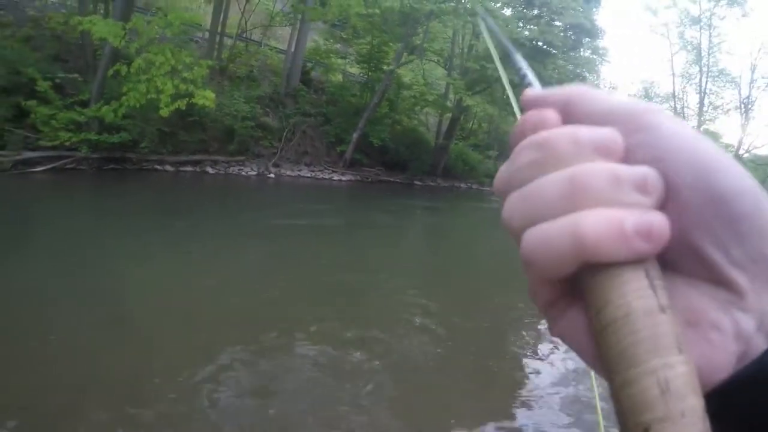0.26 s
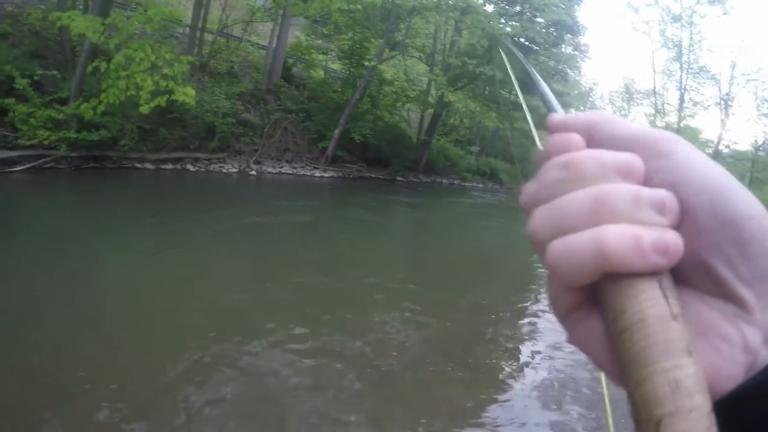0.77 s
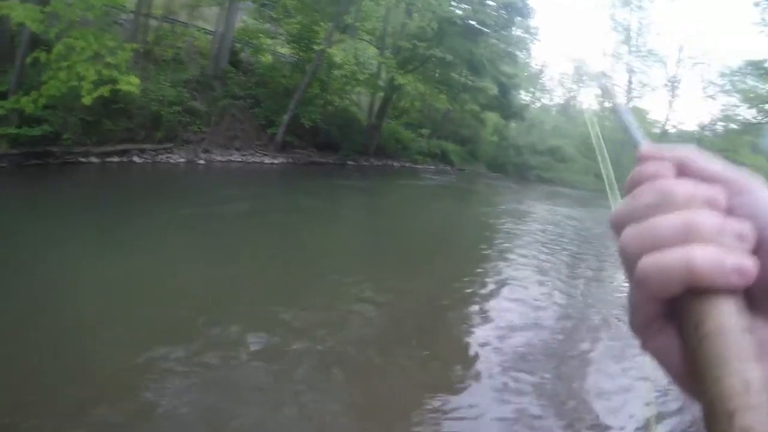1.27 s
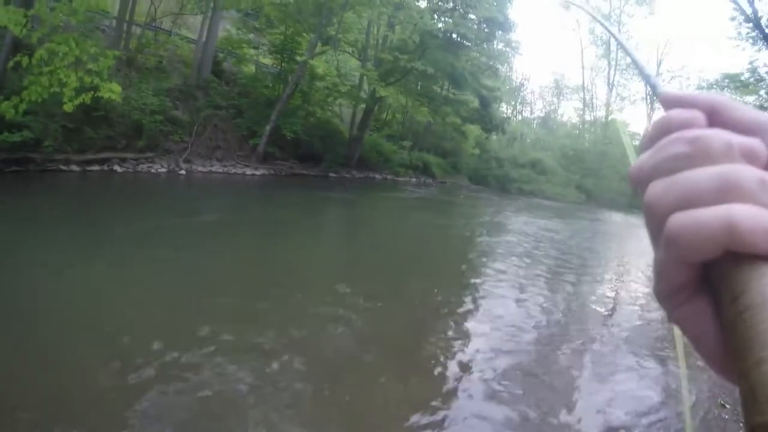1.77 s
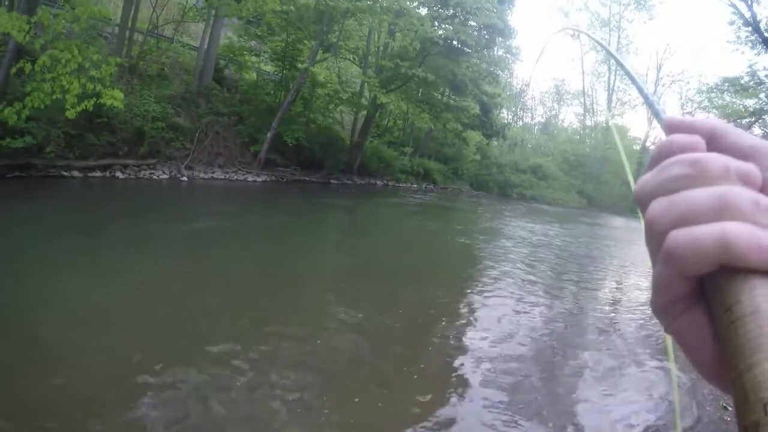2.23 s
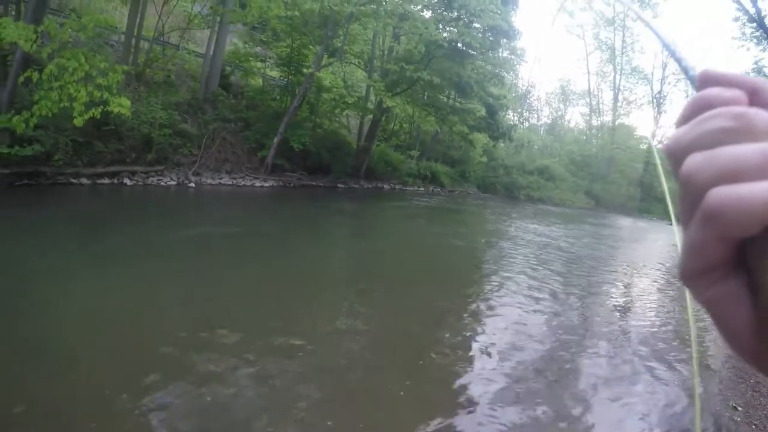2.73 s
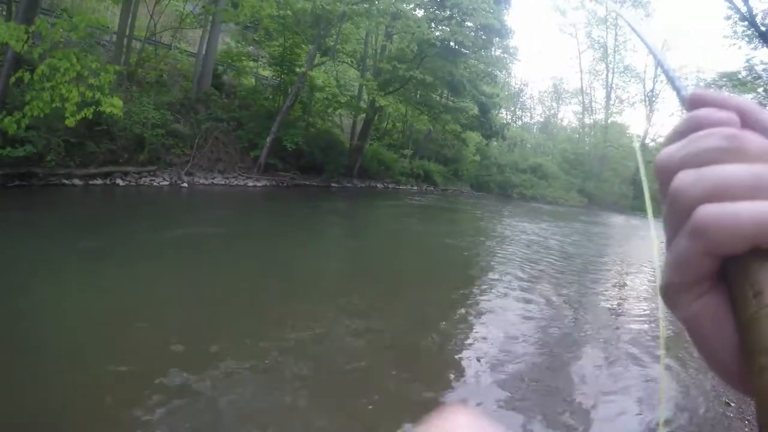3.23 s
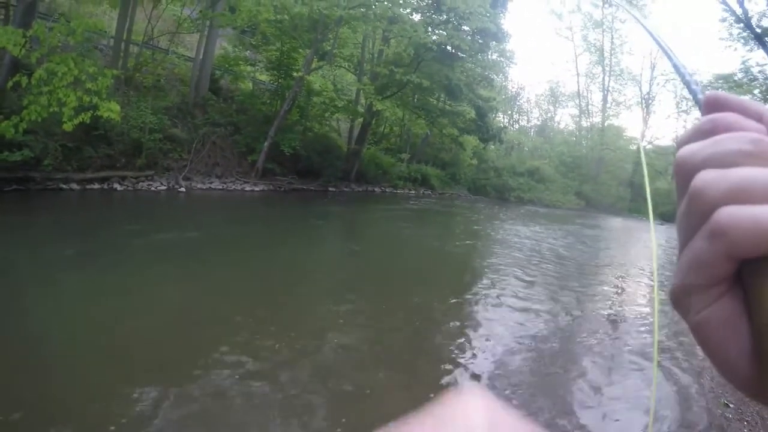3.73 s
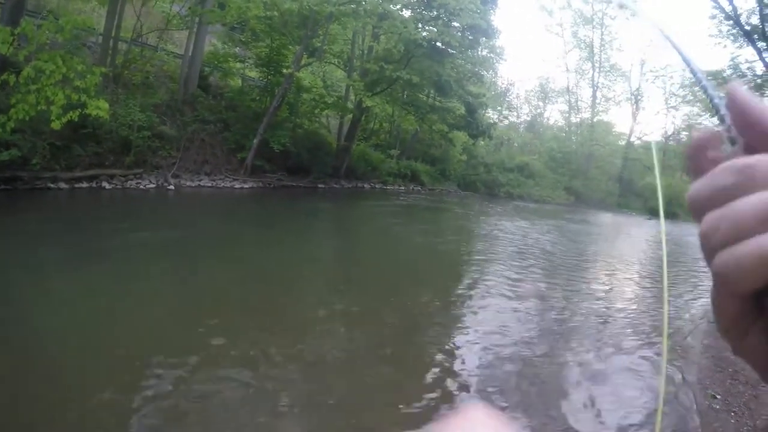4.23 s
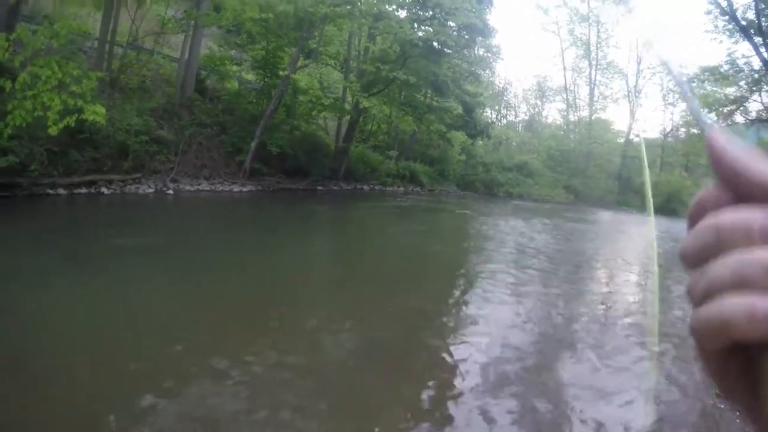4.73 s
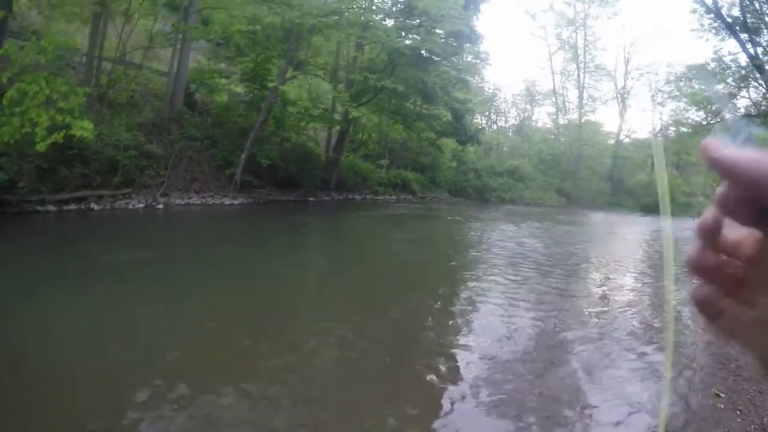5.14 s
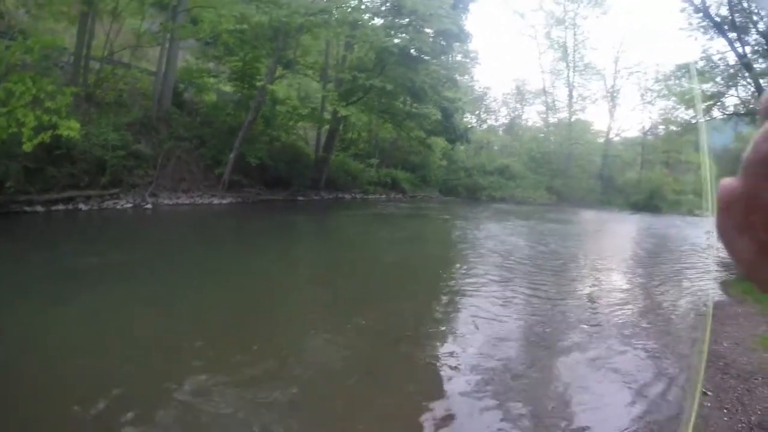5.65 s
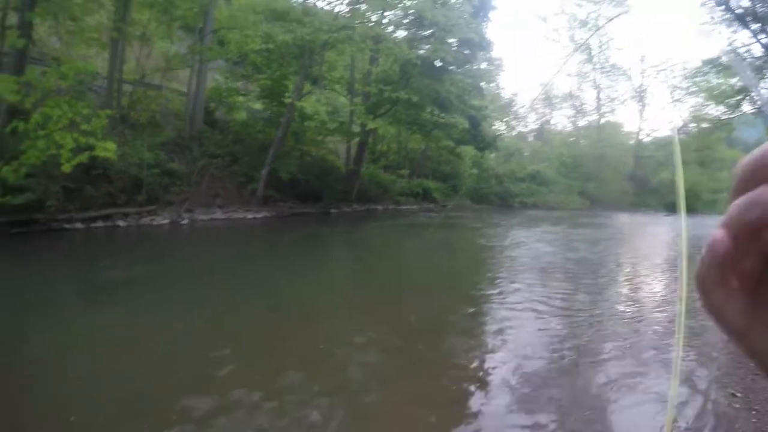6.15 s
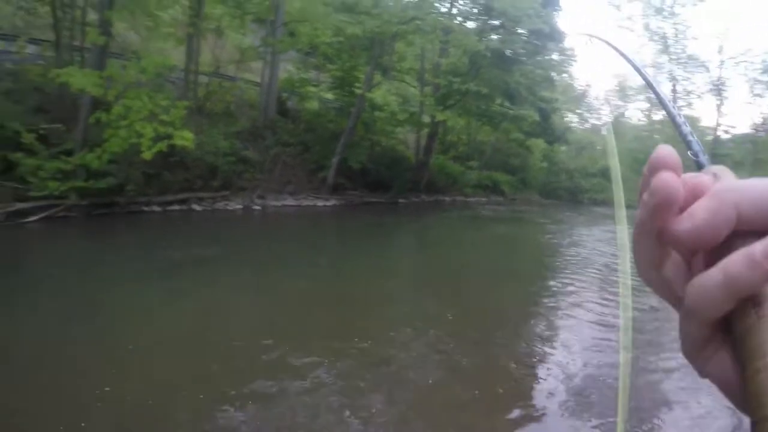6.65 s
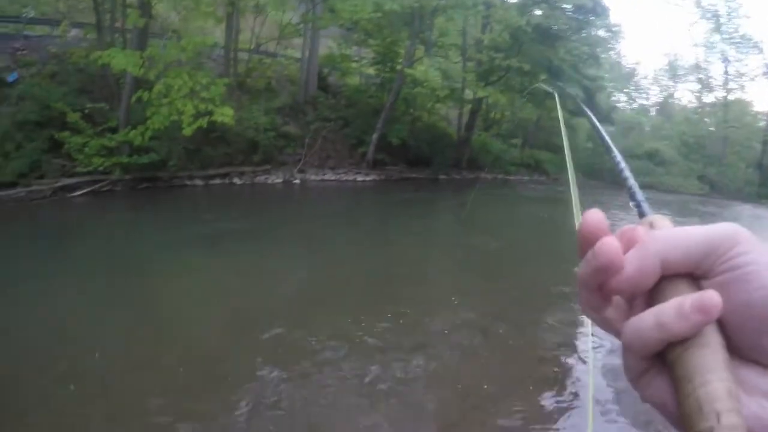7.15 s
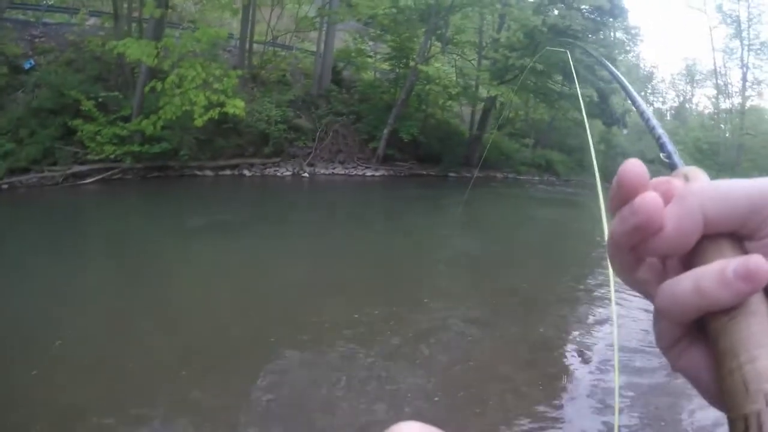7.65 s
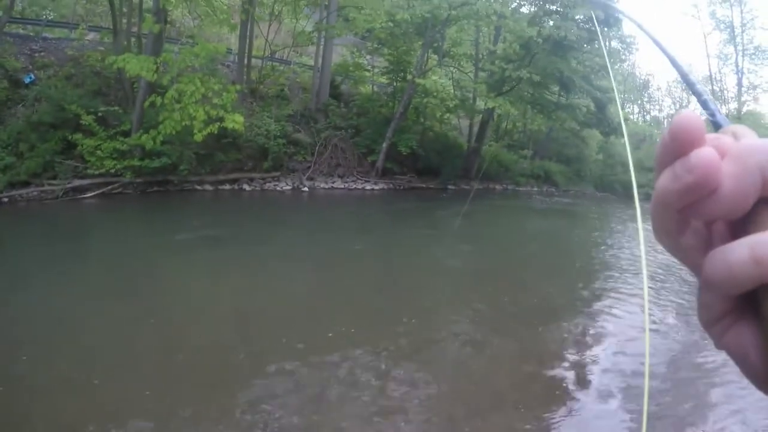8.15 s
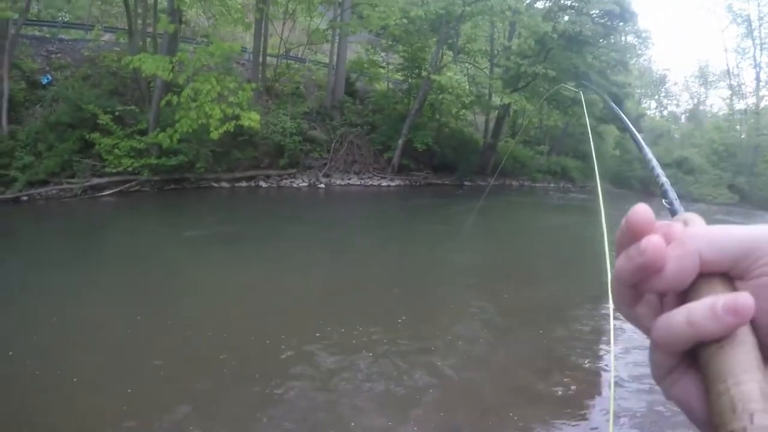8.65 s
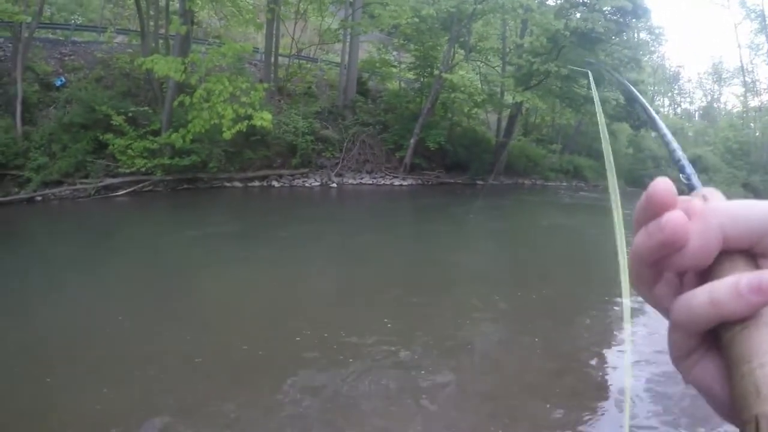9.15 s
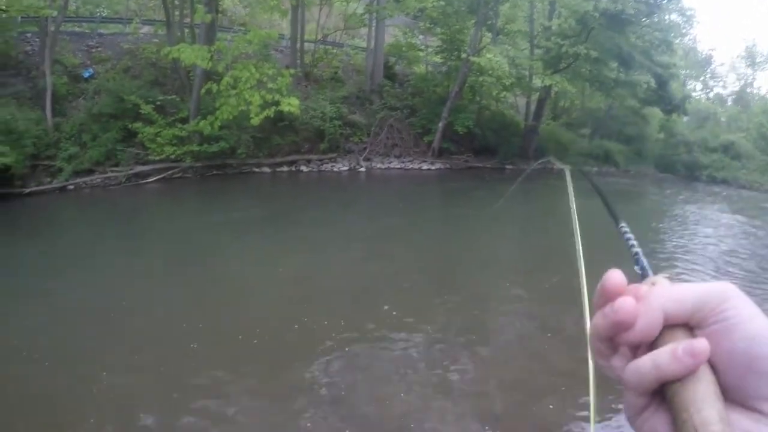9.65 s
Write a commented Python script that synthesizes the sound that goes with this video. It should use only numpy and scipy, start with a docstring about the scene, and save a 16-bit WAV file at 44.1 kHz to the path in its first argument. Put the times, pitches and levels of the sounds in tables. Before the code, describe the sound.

A fly fishing reel clicks close to a body-worn microphone beside a slow river. About ten sharp, metallic ticks sound in the first 0.6 seconds. Two short ratcheting buzzes follow at about 1.1 and 1.3 seconds as a fish takes line. The reel then rests, and things are quietest from 2 to 2.7 seconds. From 3 to 5 seconds it winds in a run of quick, uneven clicks. It pauses again, with a faint sleeve rustle around 6 to 6.7 seconds. Scattered single ticks return near 7 seconds, crowd together after 9, and become a fast, raspy buzz from 9.7 seconds to the end. Low rumble and dull bumps from body movement run underneath, with light cloth rubbing and occasional soft, hollow knocks, the clearest at about 7.7 seconds. The river is a faint, steady wash throughout.

```python
"""At the edge of a slow river, an angler with a chest camera plays a fish on a click-and-pawl fly reel.
Each tooth of the spool deflects and releases the pawl, an impact that excites the reel's damped modes:
single ticks, short runs and a last fast buzz as the fish takes line. Body motion rocks the camera,
knocks ring its housing and cloth friction rustles. The river murmurs behind as broadband noise."""
import sys
import numpy as np
from scipy import signal
from scipy.fft import rfft, irfft
from scipy.io import wavfile
from scipy.ndimage import uniform_filter1d

SR = 44100
rng = np.random.default_rng(int(sys.argv[2]) if len(sys.argv) > 2 else 0)


def wrap_up_sound(samples):
    """Save the sound to the file named by the first command line argument, as 16-bit audio."""
    columns = np.atleast_2d(samples).T
    # keep every value between -1 and 1, then stretch to whole-number steps
    tamed = np.clip(columns, -1, 1)
    steps = np.round(tamed * 32767).astype(np.int16)
    wavfile.write(sys.argv[1], SR, steps)


N = 435708
TIME = np.arange(N) / SR
SIZE = 4096  # samples in one impact
AGE, FREQ = np.arange(SIZE) / SR, np.fft.rfftfreq(SIZE, 1 / SR)
LEAD_S = 0.004  # the pawl's sound starts this long before its release
SINCE_RELEASE = AGE - LEAD_S


# single snaps of the pawl: t/s, level/dB
SNAPS = [(0.156, -38.5), (0.223, -37.5), (0.236, -43), (0.261, -33), (0.308, -31), (0.352, -35),
         (0.358, -32), (0.39, -32.5), (0.443, -29), (0.603, -27), (2.976, -29), (3.04, -35.5),
         (3.081, -33.5), (3.127, -34.5), (3.152, -41.5), (3.192, -26.5), (3.243, -30), (3.294, -29.5),
         (3.362, -32.5), (3.401, -29.5), (3.434, -25), (3.475, -31), (3.537, -31.5), (3.578, -31),
         (3.633, -31.5), (3.695, -33), (3.743, -30), (3.816, -33), (3.864, -32), (3.901, -31.5),
         (3.94, -32), (3.985, -36), (4.021, -42), (4.042, -34.5), (4.057, -38), (4.087, -33.5),
         (4.165, -32.5), (4.227, -29.5), (4.424, -26.5), (4.471, -26), (4.51, -30.5), (4.545, -26.5),
         (4.584, -29), (4.625, -30.5), (4.67, -35.5), (4.705, -33), (4.757, -36), (4.798, -29),
         (4.838, -29.5), (4.862, -35), (4.901, -29), (4.955, -27), (4.997, -31.5), (5.037, -32.5),
         (6.922, -28), (7.105, -24), (7.314, -24.5), (7.766, -21), (7.859, -26.5), (8.022, -29.5),
         (8.303, -29), (8.48, -27), (8.562, -28), (8.574, -29), (8.688, -27), (8.741, -29.5),
         (8.857, -30.5), (8.999, -27), (9.092, -21.5), (9.135, -24.5), (9.173, -30), (9.212, -32),
         (9.261, -23), (9.285, -31), (9.315, -26), (9.356, -39), (9.368, -26), (9.378, -53), (9.401, -26),
         (9.425, -17), (9.461, -22.5), (9.519, -26.5), (9.551, -28.5), (9.579, -25), (9.606, -24.5),
         (9.63, -26), (9.651, -23)]
# winding in tightens the pawl and lets spool and rod ring more: start t/s, end t/s
WINDING_IN = [(0.1, 0.47), (3.1, 5.06)]
# thin, lasting modes of the spool: f/Hz, relative level/dB, T60/s
SPOOL_MODES = [(3720, -17, 0.029), (7140, -28, 0.076), (8600, -24, 0.027)]
# low modes of rod and grip: f/Hz, relative level/dB, T60/s
ROD_MODES = [(189, -20, 0.054), (235, -20.5, 0.031), (292, -23, 0.044), (370, -27, 0.04)]
def reel(pawl_hz=3308, usual_db=-27.5, graze_below_db=-35, rod_lag_s=0.0019):
    """Impact excitation: each tooth flicks the pawl, which rings itself, the frame, spool and rod."""
    times, db = np.vstack([SNAPS] + [teeth(run) for run in LINE_RUNS]).T
    count = len(times)
    winding = sum((times > start) & (times < end) for start, end in WINDING_IN)
    pitch_scatter, crack_scatter, rod_scatter = rng.standard_normal((count, 3)).T
    hz = pawl_hz + 324 * winding + np.where(winding, 215, 80) * np.clip(pitch_scatter, -1, 2)
    # the spring limits the crack, so strong snaps sound rounder; a mere graze loses it
    graze_db = np.maximum(graze_below_db - db, 0)
    crack_db = -27.5 + 0.24 * (db - usual_db) - 2 * graze_db - winding
    treble_db = (crack_db + 0.75 * crack_scatter - db)[:, None]
    steel = steel_response(count)
    rattle = contact(frame_response(), count, rise_s=0.00072, fall_s=0.00024, tail_db=-2.5, tail_s=0.0046)
    crack = contact(steel, count, rise_s=0.0006, fall_s=0.00042, tail_db=-10.5, tail_s=0.0038)
    # a brighter snap trades the pawl's clean note for the frame's dry rattle
    body = unit_energy(pawl_note(hz) + undb(-3 + 0.98 * treble_db) * rattle)
    force = undb(db)[:, None]
    snaps = force * (body + undb(treble_db) * crack)
    spool = force * undb(-3 + 9 * winding)[:, None] * ring(SPOOL_MODES, count)
    rod = undb(-26 - graze_db + 3 * winding + 2 * rod_scatter)[:, None] * ring(ROD_MODES, count)
    return place(times - LEAD_S, snaps) + place(times, spool) + place(times + rod_lag_s, rod)


# the fish takes line, one curve per run: t/s, tooth-passing f/Hz, level/dB
LINE_RUNS = [
    [(1.106, 50.3, -21.5), (1.135, 81, -22.5), (1.172, 45, -24)],
    [(1.279, 14.5, -24.5), (1.32, 71.5, -23), (1.365, 108.9, -26), (1.425, 75.8, -21.5)],
    [(9.6712, 67, -21), (9.688, 104.4, -23.5), (9.72, 117.9, -28), (9.795, 89.6, -25), (9.835, 154.6, -26),
     (9.879, 168.7, -24.5)],
]
def teeth(run, scatter_db=1.3):
    """Tooth passing: the integral of the rate counts off one snap per tooth, as rows of t/s, level/dB."""
    knots, tooth_hz, db = np.transpose(run)
    t = np.arange(knots[0], knots[-1], 1 / SR)
    passed = np.cumsum(np.interp(t, knots, tooth_hz)) / SR
    times = np.interp(np.arange(int(passed[-1]) + 1), passed, t)
    levels = np.interp(times, knots, db) + scatter_db * rng.standard_normal(len(times))
    return np.column_stack([times, levels])


def pawl_note(hz):
    """Damped oscillation: the note swells as the pawl leaves the tooth, then its spring damps it."""
    phase = rng.uniform(0, 2 * np.pi, (len(hz), 1))
    envelope = swell(SINCE_RELEASE, rise=0.00037, fall=0.00089)
    return unit_energy(envelope * np.sin(2 * np.pi * hz[:, None] * SINCE_RELEASE + phase))


# bright resonances of the steel pawl and gear: f/Hz, bandwidth/Hz, gain/dB
STEEL_RESONANCES = [(1930, 720, -9), (2850, 490, -3), (3950, 190, 5.5), (4420, 210, -8.5), (4950, 315, 2),
                    (5930, 215, 4.5), (6790, 630, 2), (8620, 710, -5), (8750, 600, -4.5), (9380, 630, 3.5),
                    (10300, 930, -3), (12650, 920, 2), (13460, 690, -0.5), (14560, 530, -5)]
def steel_response(count, scatter_db=1.73):
    """Modal superposition: each tooth shares its blow differently among the steel's resonances."""
    shares_db = scatter_db * rng.standard_normal((count, len(STEEL_RESONANCES), 1))
    return sum((-1) ** k * undb(db + shares_db[:, k]) * resonance(hz, width)
               for k, (hz, width, db) in enumerate(STEEL_RESONANCES))


# resonances of pawl spring and reel frame: f/Hz, bandwidth/Hz, gain/dB
FRAME_RESONANCES = [(2000, 170, -10.5), (2590, 47, -10), (3154, 470, -4), (3730, 40, -6), (4090, 160, -7)]
def frame_response():
    """Parallel resonators: the responses of spring and frame add."""
    return sum(undb(db) * resonance(hz, width) for hz, width, db in FRAME_RESONANCES)


def contact(response, count, rise_s, fall_s, tail_db, tail_s):
    """Forced vibration: a scrape up the tooth, the snap and dying chatter drive the resonances."""
    t = SINCE_RELEASE
    chatter = (t > 0) * undb(tail_db) * np.exp(-np.abs(t) / tail_s)
    force = np.sign(rng.standard_normal((count, SIZE))) * (swell(t, rise_s, fall_s) + chatter)
    radiation = 1 / np.sqrt(1 + (2000 / (FREQ + 1)) ** 8)  # small parts radiate low notes poorly
    return unit_energy(irfft(rfft(force) * response * radiation))


# spectrum of the scraping pawl: f/Hz, relative level/dB
RASP_SPECTRUM = [(1200, -8), (2500, 4), (3700, 2), (5200, 5), (7000, -8), (9500, -9), (11000, -19),
                 (15000, -12)]
def rasp(limit_db=-44, knee_hz=100):
    """Sliding friction: on a fast spool the pawl never settles and scrapes between snaps."""
    tooth_hz = sum(np.interp(TIME, *np.transpose(run)[:2], left=0, right=0) for run in LINE_RUNS)
    scrape = colour(rng.standard_normal(N), RASP_SPECTRUM)
    return scrape * undb(limit_db) * np.tanh(tooth_hz / knee_hz) ** 3


# the pawl eases off a tooth: t/s, level/dB
SOFT_RELEASES = [(0.174, -36), (0.856, -37.5), (0.869, -42.5), (3.858, -40), (4.235, -40), (4.882, -39),
                 (7.854, -39), (8.977, -40), (9.111, -38)]
def easing(pawl_hz=3170):
    """Free vibration without impact: let down slowly, the pawl gives only its own soft note."""
    times, db = np.transpose(SOFT_RELEASES)
    return place(times - LEAD_S, undb(db)[:, None] * pawl_note(np.full(len(times), pawl_hz)))


# blows of hand and rod butt near the camera housing: t/s, level/dB, extra thud level/dB
BLOWS = [(0.158, -38.5, -2), (0.238, -41.5, -1), (0.358, -39.5, -0.5), (1.022, -42.5, -0.5),
         (1.45, -43.5, 6.5), (2.172, -46, 0), (3.048, -45, 5.5), (3.532, -42, -10), (3.738, -45, 3),
         (4.021, -42.5, -2), (4.6, -46, 4), (4.691, -41, 3), (4.985, -43, 6), (5.961, -45.5, 3),
         (6.771, -38, 4), (7.111, -50, 3), (7.32, -49.5, 11), (7.691, -28.5, -5.5), (7.775, -48, 6)]
# upper modes of the housing: f/Hz, relative level/dB, T60/s
RAP_MODES = [(665, 8.5, 0.0062), (940, 0.5, 0.0075), (1075, -12, 0.016), (1400, 3.5, 0.0054),
             (1660, -2.5, 0.022), (2980, 3.5, 0.0046)]
# its hollow low modes: f/Hz, relative level/dB, T60/s
THUD_MODES = [(257, -1, 0.037), (365, -4, 0.044), (498, -6.5, 0.077), (778, -5, 0.021)]
def knocks(scuff_s=0.0097):
    """Impulse response: soft blows ring the housing, each with a short scuff and a hollow thud."""
    times, db, thud_db = np.transpose(BLOWS)
    count = len(times)
    friction = rng.standard_normal((count, SIZE)) * np.exp(-AGE / scuff_s)
    scuff = unit_energy(irfft(rfft(friction) * resonance(hz=690, width_hz=1700) ** 2))
    rap = undb(-3) * (ring(RAP_MODES, count) + undb(-3) * scuff)
    thud = undb(thud_db[:, None] - 1) * ring(THUD_MODES, count)
    return place(times, undb(db)[:, None] * (rap + thud))


# jolts of the camera on its strap: t/s, envelope peak level/dB, swing f/Hz
JOLTS = [(0.02, -38, 36), (0.291, -28, 52.7), (0.79, -42, 38), (1.03, -26.5, 60), (1.17, -25, 61),
         (1.252, -27, 61), (1.432, -22.5, 73), (2.241, -25.5, 36.6), (2.48, -26.5, 35.8),
         (2.788, -26, 42.7), (3.027, -25.5, 44), (3.6, -24, 65.4), (3.75, -19.5, 73), (3.981, -26.5, 59),
         (4.14, -26, 49), (4.52, -24.5, 45.6), (4.6, -27, 105), (4.9, -29, 85), (4.987, -22, 48),
         (5.457, -23, 44), (5.942, -25.5, 36.5), (6.28, -23.5, 33.7), (6.411, -24.5, 39.5),
         (6.891, -23.5, 37.7), (6.999, -21, 28.8), (7.339, -25.5, 36.8), (7.82, -25, 37.7),
         (8.311, -27, 35.6), (8.792, -24, 36.2), (9.331, -26, 37), (9.591, -25.5, 49.6), (9.851, -26.5, 42)]
def bumps(flank_cycles=0.36):
    """Heavy damping: each jolt swings the camera to and fro about once."""
    times, db, hz = np.transpose(JOLTS)
    middle = AGE[-1] / 2
    cycles = hz[:, None] * (AGE - middle)
    phase = rng.uniform(0, 2 * np.pi, (len(times), 1))
    envelope = swell(cycles, flank_cycles, flank_cycles) * signal.windows.tukey(SIZE, 0.5)
    return place(times - middle, undb(db)[:, None] * envelope * np.sin(2 * np.pi * cycles + phase))


# the arm's work against the fish: t/s, effort level/dB
ARM_EFFORT = [(0.0, -59.5), (0.3, -56), (0.63, -60.5), (1.29, -54), (1.56, -59), (1.87, -63.5),
              (2.75, -62.5), (2.94, -58), (3.41, -55.5), (4.37, -54.5), (4.56, -55.5), (4.81, -52),
              (5.31, -61.5), (6.03, -58.5), (6.3, -57.5), (6.69, -60.5), (6.9, -56), (7.32, -62.5),
              (7.98, -57), (8.09, -59.5), (9.16, -58), (9.88, -51)]
def arm_effort(steady_hold_db=-57.5):
    """Amplitude modulation: effort, in dB above a steady hold, drives rumble and cloth noise."""
    return np.interp(TIME, *np.transpose(ARM_EFFORT)) - steady_hold_db


# spectrum of the body's sway: f/Hz, relative level/dB
SWAY_SPECTRUM = [(10, -1.5), (21, -11), (30, 1), (48, -7.5), (62, -10), (90, -26.5), (200, -58)]
# spectrum of the arm's judder: f/Hz, relative level/dB
JUDDER_SPECTRUM = [(45, -30.5), (66, -6), (85, -2), (108, -8), (150, -17.5), (300, -28.5)]
# the body keeps still: start t/s, end t/s
STILLNESS = [(1.97, 2.72)]
def rumble(pull_db, still_db=-11):
    """Structure-borne sound: the camera rocks with the body and judders when the arm pulls."""
    sway = rocking(SWAY_SPECTRUM, steady_s=0.14) * undb(-40 + 0.34 * pull_db + 3 * wander(9))
    judder = rocking(JUDDER_SPECTRUM, steady_s=0.21) * undb(-49.5 + pull_db)
    return (sway + judder) * undb(still_db * during(STILLNESS, ramp_s=0.063))


def rocking(spectrum, steady_s):
    """Random vibration: low noise divided by its running rms swings with nearly even strength."""
    swing = colour(rng.standard_normal(N), spectrum)
    power = uniform_filter1d(np.abs(signal.hilbert(swing)) ** 2, int(steady_s * SR)) / 2
    return swing / np.sqrt(power)


# spectrum of cloth rubbing the housing: f/Hz, relative level/dB
RUB_SPECTRUM = [(70, -32), (130, 1.5), (220, 1.5), (330, -6.5), (500, -1), (800, -6), (1120, -29),
                (1400, -28), (1750, -36.5), (3000, -12)]
# spectral weighting of the sleeve's folds: f/Hz, relative level/dB
FOLD_SPECTRUM = [(600, -2.5), (1100, 10.5), (1400, 1.5), (1750, 7), (2300, 0.5), (3200, 1.5), (4100, 0),
                 (5500, -4.5), (7500, -15.5), (10000, -28.5), (15000, -27)]
# the hand shifts, the sleeve lifts off the housing and rustles more: start t/s, end t/s
GRIP_SHIFT = [(5.88, 6.7)]
def clothing(pull_db, effort_db, slips_per_s=35):
    """Stick-slip friction: cloth tugs over the housing while folds of the sleeve scrape."""
    slips = (rng.random(N) < slips_per_s / SR) * rng.uniform(-1, 1, N)
    # soft cloth lets go over about a millisecond, which keeps each tug dull
    tugs = signal.sosfilt(signal.butter(2, 600, fs=SR, output="sos"), slips)
    slide = undb(-32) * rng.uniform(-1, 1, N)
    folds = 0
    for band_hz in [(500, 1400), (1400, 2600), (2600, 4500), (4500, 15000)]:
        bandpass = signal.butter(3, band_hz, "bandpass", fs=SR, output="sos")
        hiss = signal.sosfilt(bandpass, rng.standard_normal(N))
        folds += hiss * undb(2 * wander(35) + wander(250))
    regrip = during(GRIP_SHIFT, ramp_s=0.12)
    rub = colour(tugs + slide, RUB_SPECTRUM) * undb(-59 + 1.31 * pull_db - 3 * regrip)
    rustle = colour(folds, FOLD_SPECTRUM) * undb(-60.5 + 0.74 * effort_db + 2.5 * regrip)
    return rub + rustle


# short swishes, low thuds and the rod's low swell under the last run:
# t/s, duration/s, centre f/Hz, level/dB
NOISE_BURSTS = [(0.595, 0.15, 3550, -62.5), (0.874, 0.095, 284, -50.5), (0.893, 0.15, 1600, -55.5),
                (1.142, 0.03, 1560, -49), (1.201, 0.041, 1460, -52.5), (1.39, 0.12, 290, -49),
                (4.183, 0.11, 2300, -57), (4.609, 0.08, 192, -39.5), (5.758, 0.017, 4170, -59),
                (5.97, 0.04, 4900, -64), (6.057, 0.027, 1070, -53.5), (6.12, 0.2, 4000, -66),
                (6.14, 0.19, 1090, -62), (6.375, 0.3, 7000, -66), (6.548, 0.0074, 1030, -47),
                (6.726, 0.14, 1050, -60), (8.587, 0.049, 302, -48), (9.74, 0.34, 322, -51)]
def swishes_and_thuds(skirt_db=-30):
    """Band-limited noise under Gaussian envelopes: high bands swish, low ones thud or swell."""
    out = np.zeros(N)
    for t, duration, hz, db in NOISE_BURSTS:
        band = colour(rng.standard_normal(N), [(hz / 2, skirt_db), (hz, 0), (hz * 2, skirt_db)])
        out += band * undb(db) * np.exp(-(2 * (TIME - t) / duration) ** 2)
    return out


# spectrum of the moving water: f/Hz, relative level/dB
WATER_SPECTRUM = [(120, -11), (220, -4), (330, 7.5), (490, 4.5), (800, -9), (1120, 5), (1420, -2.5),
                  (1730, 2.5), (2350, -7.5), (3200, -5), (4800, -23), (7000, -15), (10000, -18.5),
                  (15000, -20)]
def river(level_db=-61.5):
    """Flow noise: an even wash of moving water that ripples slightly."""
    ripple_db = 0.4 * wander(9)
    return colour(rng.standard_normal(N), WATER_SPECTRUM) * undb(level_db + ripple_db)


def undb(db):
    """Level in decibels to amplitude ratio."""
    return 10 ** (np.asarray(db) / 20)


def wander(rate_hz):
    """Slow random modulation: held random steps, smoothed twice, with standard deviation 1."""
    hold = int(SR / rate_hz)
    steps = np.repeat(rng.uniform(-1, 1, N // hold + 1), hold)
    smooth = uniform_filter1d(uniform_filter1d(steps, hold), hold)[:N]
    return smooth / np.std(smooth)


def colour(x, spectrum):
    """Spectral shaping: filter x by points of f/Hz, level/dB and scale to rms 1."""
    hz, db = np.transpose(spectrum)
    f = np.fft.rfftfreq(N, 1 / SR) + 1e-3
    gain = undb(np.interp(np.log(f), np.log(hz), db, left=-80, right=-80))
    shaped = irfft(rfft(x) * gain, N)
    return shaped / np.std(shaped)


def resonance(hz, width_hz):
    """Frequency response of a damped oscillator, gain 1 at its centre."""
    return 1j * FREQ * width_hz / (hz ** 2 - FREQ ** 2 + 1j * FREQ * width_hz)


def ring(modes, count, spread_db=4.5):
    """Exponential modal decay for count blows, each mode with random strength and sign."""
    chance = rng.uniform(-1, 1, (count, len(modes), 2, 1))
    out = 0
    for k, (hz, db, t60) in enumerate(modes):
        envelope = undb(db + spread_db * chance[:, k, 0] - 60 * AGE / t60)
        out += envelope * np.sign(chance[:, k, 1]) * np.sin(2 * np.pi * hz * AGE)
    return out


def swell(t, rise, fall):
    """Hyperbolic-secant envelope peaking at t = 0; rise and fall share the unit of t."""
    return 1 / np.cosh(np.minimum(np.abs(t) / np.where(t < 0, rise, fall), 20))


def during(spans, ramp_s):
    """Gating: 1 inside the spans and 0 outside, with linear ramps."""
    inside = sum((TIME > start) & (TIME < end) for start, end in spans)
    return uniform_filter1d(inside.astype(float), int(ramp_s * SR))


def unit_energy(hits):
    """Normalisation: each row gets the energy of one millisecond at rms 1."""
    return hits / np.sqrt(np.sum(hits ** 2, axis=1, keepdims=True) / (SR / 1000))


def place(times, sounds):
    """Delay and sum: each row of sounds starts at its time."""
    out = np.zeros(N + 2 * SIZE)
    for t, sound in zip(times, sounds):
        start = int(np.clip(t * SR, 0, N))
        out[start:start + SIZE] += sound
    return out[:N]


def scene():
    """Linear superposition: reel, handling and river add at one microphone in the open air."""
    effort_db = arm_effort()
    pull_db = effort_db + 2.5 * wander(14)  # the effort wavers as the fish tugs
    tackle = reel() + rasp() + easing()
    handling = knocks() + bumps() + rumble(pull_db) + clothing(pull_db, effort_db) + swishes_and_thuds()
    return (tackle + handling + river())[None]


def record(dry):
    """Band limiting: the camera's steep low-pass cuts the treble above 15.2 kHz."""
    return signal.sosfilt(signal.ellip(8, 0.2, 70, 15200, fs=SR, output="sos"), dry)


dry = scene()
out = record(dry)
wrap_up_sound(out)
```